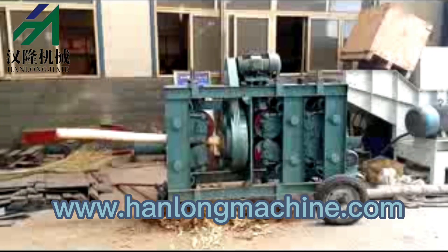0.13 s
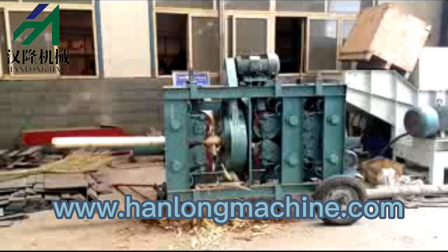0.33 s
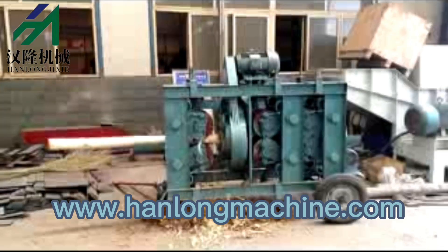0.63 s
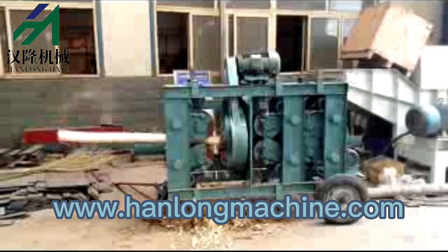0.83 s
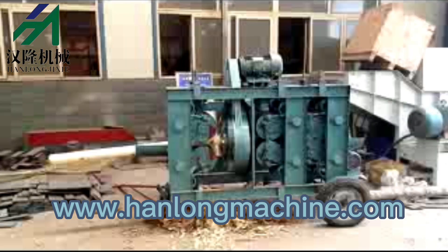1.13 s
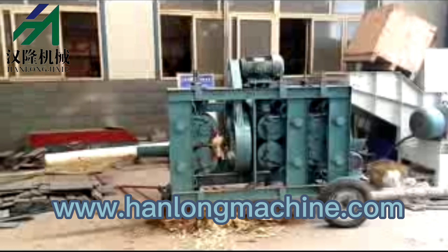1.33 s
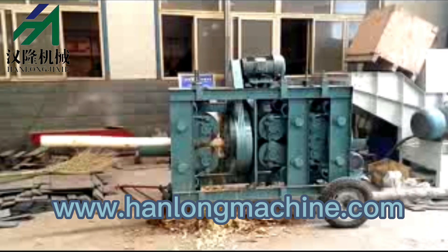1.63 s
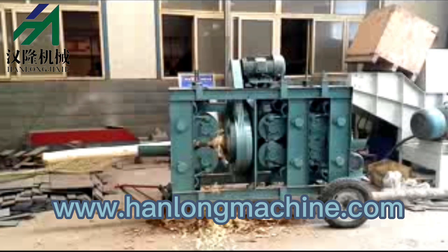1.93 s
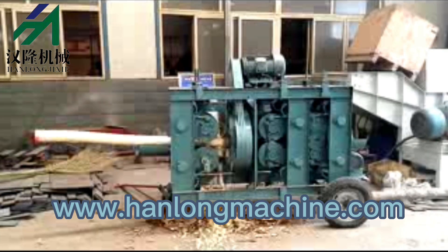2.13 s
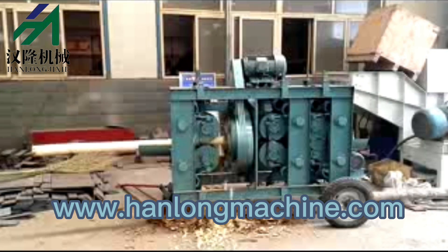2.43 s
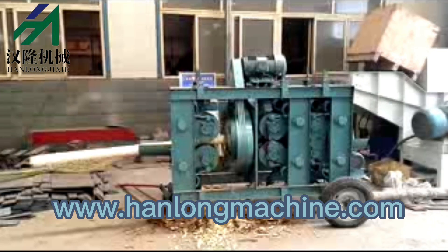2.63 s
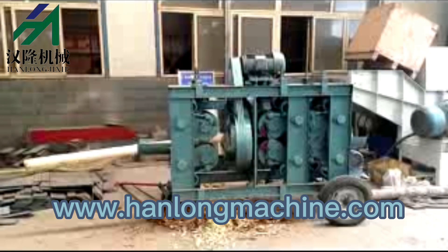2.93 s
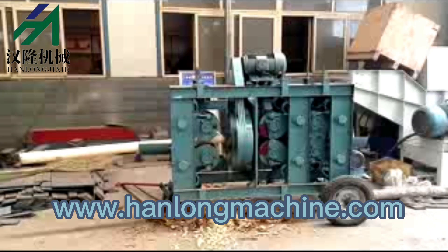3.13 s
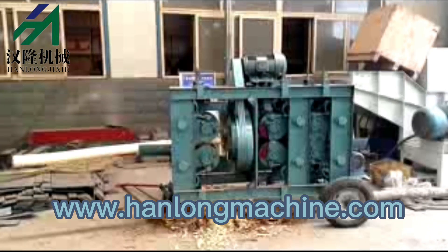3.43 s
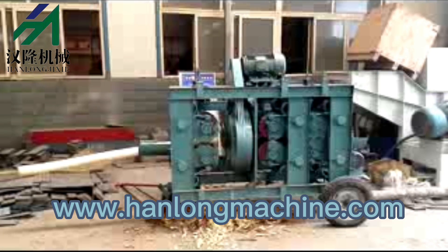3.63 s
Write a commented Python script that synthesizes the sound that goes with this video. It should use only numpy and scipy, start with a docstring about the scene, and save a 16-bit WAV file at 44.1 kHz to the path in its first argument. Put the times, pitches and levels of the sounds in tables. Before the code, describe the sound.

A wood debarker scrapes a log with a steady harsh roar over motor rumble; rasping bites, thin squeals and dull thumps come and go, then a loud knock rattles near the end, outdoors in stereo.

```python
"""A wood debarker at work in a yard, in stereo from two microphone ports.
From the start the rotor's knives scrape a log as random snaps of noise over a coloured, ringing drive rumble.
A thin squeak sounds at the start, over the first bites of the knives and their faint singing (noise-driven
resonances); the log thumps on the feed rollers as decaying sines. Near the end it knocks and rattles on the
steel in ringing modes and cracks; a wall answers, and the camera's limiter holds the knock down."""
import sys
import numpy as np
from scipy import signal
from scipy.fft import rfft, irfft, next_fast_len
from scipy.io import wavfile
from scipy.ndimage import uniform_filter1d, map_coordinates

SR = 44100
rng = np.random.default_rng(int(sys.argv[2]) if len(sys.argv) > 2 else 0)


def wav_record(signal):
    """Record a signal, one row per channel, as 16-bit PCM in the file named by sys.argv[1]."""
    frames = np.transpose(np.atleast_2d(signal))
    bounded = np.clip(frames, -1, 1)
    # unit amplitude maps onto the largest positive 16-bit level
    quanta = np.round(bounded * 32767).astype(np.int16)
    wavfile.write(sys.argv[1], SR, quanta)


N = 167139

# colour of the flying chips: (frequency [Hz], relative density [dB per Hz])
CHIP_SPECTRUM = [(2000, -27.5), (3500, -6.5), (4100, -2.5), (4600, 1.5), (5200, -6), (6000, -13.5),
                 (7000, -16.5), (8500, -24.5), (9800, -32.5), (11500, -117)]


def amp(db):
    """Decibels to gain."""
    return 10 ** (np.asarray(db) / 20)


def unit(x):
    """Scaled to rms 1."""
    return x / np.sqrt(np.mean(x ** 2) + 1e-20)


def along(points, hz):
    """(Hz, value) points read on a log frequency axis."""
    point_hz, values = np.transpose(points)
    return np.interp(np.log(hz + 1), np.log(point_hz + 1), values)


def clock():
    """The time of every sample [s]."""
    return np.arange(N) / SR


def curves(rows):
    """One value per sample for each column after the time."""
    times, *columns = np.transpose(rows)
    return [np.interp(clock(), times, column) for column in columns]


def wobble(rate):
    """A smooth random curve through `rate` random knots a second."""
    knots = rng.standard_normal(4096)
    return map_coordinates(knots, [clock() * rate + 2], mode="wrap")


def filtered(x, response):
    """x with its spectrum multiplied by a response of frequency, padded against wrap-around."""
    size = next_fast_len(N + SR // 2)
    gain = response(np.fft.rfftfreq(size, 1 / SR))
    return irfft(rfft(x, size) * gain, size)[..., :N]


def spread(pair, spectrum):
    """Two unrelated signals coloured and mixed as mid and side into a stereo sound of rms 1."""
    # how alike the two ports hear the place: (frequency [Hz], left-right correlation [-1 to 1])
    likeness = [(30, -0.18), (70, 1), (200, 0.91), (350, 0.69), (550, 0.32), (850, 0.54), (1600, 0.52),
                (2100, 0.086), (3200, 0.16), (4300, -0.13), (5500, -0.065), (9000, 0.23)]

    def mid_side(hz):
        turn = np.arccos(np.clip(along(likeness, hz), -1, 1)) / 2
        return amp(along(spectrum, hz)) * [np.cos(turn), np.sin(turn)]

    mid, side = filtered(pair, mid_side)
    return unit(np.array([mid + side, mid - side]))


def patchy(patchy_db):
    """Two noises sharing smooth time-frequency patches of random gain, rms 1."""
    z = signal.stft(rng.standard_normal((2, N)), nperseg=512)[2]
    field = rng.standard_normal(z.shape[1:])
    field = uniform_filter1d(uniform_filter1d(field, size=5, axis=0), size=10, axis=1)
    return unit(signal.istft(z * amp(patchy_db * unit(field)), nperseg=512)[1][:, :N])


def tearing(patchy_db):
    """Snapping fibres of uneven size, each a fading swell of noise power, over steady rubbing noise."""
    snaps_per_s, size_db, snap_share, t60 = 650, 0.5, 0.25, 0.016  # share of power; t60 in s
    sizes = amp(size_db * np.minimum(rng.exponential(size=N), 2.5))
    snaps = (rng.random(N) < snaps_per_s / SR) * sizes ** 2
    # power fades at twice the rate of amplitude
    energy = signal.lfilter([1], [1, -np.exp(-2 * np.log(1000) / (t60 * SR))], snaps)
    power = 1 - snap_share + snap_share * energy / energy.mean()
    return np.sqrt(power) * patchy(patchy_db)


def resonance(hz, width_hz):
    """A resonance driven at random, heard at two points, rms 1: slow noise on a sine and a cosine."""
    phase = 2 * np.pi * np.cumsum(hz * np.ones(N)) / SR
    points = [wobble(width_hz) * np.sin(phase) + wobble(width_hz) * np.cos(phase) for _ in range(2)]
    return unit(np.array(points))


def burst(start, attack, hold, t60):
    """An envelope [s]: exponential attack, release by 60 dB per t60 once `hold` has passed since start."""
    t = np.maximum(clock() - start, 0)
    release = np.exp(-np.log(1000) * np.maximum(t - hold, 0) / t60)
    return (1 - np.exp(-t / attack)) * release


def knives():
    """The knives scrape, the housing roars and chips hiss: torn noises sharing one chatter in level."""
    # how hard the knives work: (time [s], scraping before trim [dB], chip hiss [dB])
    load = [(0, -16, -18.5), (0.18, -17.5, -22.5), (0.42, -15, -21), (0.68, -18.5, -22), (0.88, -17, -23),
            (1.12, -17, -20.5), (1.23, -19.5, -24), (1.35, -17.5, -22.5), (1.65, -18, -21.5),
            (2.03, -20.5, -24.5), (2.45, -17, -20.5), (2.8, -20, -23), (2.98, -16, -23.5),
            (3.15, -18.5, -23), (3.3, -18, -21.5), (3.55, -19, -21), (3.79, -19.5, -23.5)]
    # roar of the housing: (time [s], level before trim [dB])
    housing = [(0, -21.5), (0.4, -22), (0.7, -24.5), (1.1, -24), (1.22, -23.5), (1.34, -19.5), (1.6, -24),
               (2.0, -24), (2.75, -25), (3.3, -23), (3.79, -23.5)]
    # colours of roar and scraping: (frequency [Hz], relative density [dB per Hz])
    roar_spectrum = [(200, -39), (430, -10.5), (540, 4.5), (660, 0), (780, 4), (1000, 1.5), (1250, 1.5),
                     (2000, -11.5), (5000, -66), (11000, -92)]
    scrape_spectrum = [(400, -39.5), (900, -10), (1400, -1), (1900, 0), (2200, 1), (2600, 0.5),
                       (3400, -0.5), (4000, -7), (5500, -11.5), (8000, -35), (10000, -44.5), (11500, -104)]
    roar_trim_db, scrape_trim_db = 0.5, 0.5

    scrape_db, hiss_db = curves(load)
    roar_db, = curves(housing)
    chatter_db = 0.4 * wobble(27.55)
    roar_db = roar_db + roar_trim_db + chatter_db + 0.13 * wobble(11)
    roar = amp(roar_db) * spread(tearing(patchy_db=1.9), roar_spectrum)
    scrape_db = scrape_db + scrape_trim_db + chatter_db + 0.12 * wobble(7.83)
    scrape = amp(scrape_db) * spread(tearing(patchy_db=1.5), scrape_spectrum)
    hiss_db = hiss_db + chatter_db + 0.38 * wobble(14)
    hiss = amp(hiss_db) * spread(tearing(patchy_db=2.3), CHIP_SPECTRUM)
    return roar + scrape + hiss


def rasp_bursts():
    """Bites rip off bark and throw chips, each rasping around its own pitch; the last is the knock's tail."""
    # bursts of rasp, bites into the bark and last the tail of the knock: (time [s], rasp level [dB],
    # hold [s], hiss level [dB], centre of the rasp [Hz], how far the centre stands out [dB])
    burst_rows = [(.005, -18, 0.032, -25, 1790, 1), (0.096, -14.5, .02, -32, 1500, 7.5),
                  (0.29, -31, 0.012, -16, 1390, 6), (0.385, -16.5, 0.039, -37, 1280, 8.5),
                  (0.513, -15.5, 0.033, -26, 2530, 17), (0.761, -15, 0.024, -19, 2400, 3),
                  (0.985, -14, 0.013, -22, 3150, 17), (0.989, -20, 0.029, -24, 1650, 7),
                  (1.01, -20, 0.019, -29, 2900, 11), (1.021, -16.5, 0.023, -31.5, 1030, 6.5),
                  (1.083, -16, 0.033, -24, 2520, 6), (1.314, -21.5, 0.03, -39, 845, 7),
                  (2.06, -20, 0.058, -42, 925, 2.5), (2.277, -16.5, 0.026, -18.5, 2850, 18),
                  (2.339, -18, 0.0041, -17.5, 3000, 2.5), (2.366, -14.5, 0.014, -26, 1700, 4.5),
                  (2.471, -18, 0.02, -25, 2670, 10), (2.945, -22, 0.03, -46, 1780, 9.5),
                  (3.023, -21, 0.011, -22.5, 2960, 10), (3.628, -13.5, 0.036, -23.5, 800, -3)]
    # colour of the rasp: (frequency [Hz], relative density [dB per Hz])
    bark_spectrum = [(350, -16.5), (750, -6), (1400, -2.5), (2600, -6.5), (3400, -11), (4200, -7),
                     (5500, -29), (8000, -37), (10000, -39.5), (11500, -80)]
    attack_s, t60_s, focus_octaves = 0.001, 0.045, 0.12

    bark = spread(tearing(patchy_db=1.8), bark_spectrum)
    chips = spread(tearing(patchy_db=1.6), CHIP_SPECTRUM)
    out = np.zeros((2, N))
    for start, rasp_db, hold, chip_db, focus_hz, focus_db in burst_rows:
        def focus(hz):
            octaves = np.log2((hz + 1) / focus_hz)
            return amp(focus_db * np.exp(-.5 * (octaves / focus_octaves) ** 2))

        rasp = amp(rasp_db) * unit(filtered(bark, focus))
        out += burst(start, attack_s, hold, t60_s) * (rasp + amp(chip_db) * chips)
    return out


def squeals():
    """Two knives sing as gliding resonances, a rough ring above; rubbing steel squeaks at the start."""
    # the singing knife: (time [s], pitch [Hz], level [dB])
    knife_song = [(0, 3500, -33), (.2, 3510, -27.5), (.55, 3560, -28), (.85, 3570, -27.5), (1.3, 3603, -30),
                  (1.65, 3660, -34.5), (1.98, 3650, -27.5), (2.25, 3630, -33.5), (3.7, 3640, -42)]
    # a second knife, lower, rising slightly, then dropping as it swells and fades:
    # (time [s], pitch [Hz], level [dB])
    low_song = [(.4, 3420, -43), (.8, 3415, -28.5), (1.2, 3496, -29.5), (1.65, 3536, -29),
                (2.05, 3384, -39), (2.25, 3290, -23.5), (2.7, 3300, -44.5)]
    # the higher, rougher ring: (time [s], pitch [Hz], level [dB])
    rough_ring = [(0, 4620, -29), (1.2, 4600, -44.5), (1.65, 4620, -31), (2.0, 4500, -30),
                  (2.35, 4580, -28.5), (2.9, 4660, -33), (3.3, 4650, -41)]

    def sing(rows, width_hz):
        hz, db = curves(rows)
        return amp(db) * resonance(hz, width_hz)

    songs = sing(knife_song, width_hz=55) + sing(low_song, width_hz=55) + sing(rough_ring, width_hz=190)
    squeak_shape = burst(start=0.0042, attack=0.0057, hold=0.18, t60=0.13)
    squeak = amp(-42) * squeak_shape * resonance(hz=10900, width_hz=130)
    return songs + squeak


def knock():
    """The log strikes the steel and rattles: each contact cracks as noise and rings anew in damped modes."""
    # contacts with the steel: (time [s], strength [dB])
    contacts = [(3.5875, -2), (3.589, -3.5), (3.6025, -3), (3.6080, -3), (3.6115, -4.5), (3.6175, -2),
                (3.6270, -7)]
    # what rings: (frequency [Hz], level relative to the contact [dB], t60 [s])
    modes = [(360, -17, 0.12), (618, -12.5, 0.042), (734, -11.5, 0.13), (784, -13, 0.077),
             (995, -15.5, 0.09), (1276, -13, 0.07), (1482, -8, 0.08), (1654, -8.5, 0.052),
             (1780, -4, 0.055), (2100, -4, 0.04), (2270, -7.5, 0.046), (2400, -5, 0.046),
             (2683, -7.5, 0.036), (2850, -6.5, 0.044)]
    # colour of the crack: (frequency [Hz], relative density [dB per Hz])
    crack_spectrum = [(300, -25), (800, -5.5), (1600, 4), (2800, 3), (3500, -6.5), (5000, -8.5),
                      (7200, -31), (11000, -30)]
    crack_db, crack_t60_s = -1.5, 0.035  # level relative to the contact

    ringing = np.zeros((2, N + SR))
    t = np.arange(SR // 3) / SR
    for start, db in contacts:
        first = round(start * SR)
        for hz, mode_db, t60 in modes:
            # the phase differs a little between left and right
            phase = rng.uniform(0, 2 * np.pi) + .35 * rng.standard_normal((2, 1))
            fade = np.exp(-np.log(1000) * t / t60) * (1 - np.exp(-t / 0.0011))
            detuned_hz = hz * rng.normal(1, 0.0061)
            tone = np.sin(2 * np.pi * detuned_hz * t + phase)
            ringing[:, first:first + len(t)] += amp(db + mode_db) * fade * tone
    # the cracks add in power
    power = sum((amp(db) * burst(start, 0.00023, 0, crack_t60_s)) ** 2 for start, db in contacts)
    crack = np.sqrt(power) * spread(rng.standard_normal((2, N)), crack_spectrum)
    return ringing[:, :N] + amp(crack_db) * crack


def thumps():
    """The swaying log bumps the feed rollers, each bump a decaying sine."""
    # bumps on the rollers: (time [s], pitch [Hz], level [dB])
    bumps = [(0.291, 317, -9), (0.409, 201.5, -11.5), (0.56, 228, -18), (1.127, 371, -13.5),
             (1.328, 285, -14), (2.102, 212, -17), (2.318, 197, -17)]
    attack_s, t60_s = 0.0051, 0.15
    out = np.zeros(N)
    for start, hz, db in bumps:
        tone = np.sin(2 * np.pi * hz * (clock() - start))
        out += amp(db) * burst(start, attack_s, 0, t60_s) * tone
    return out


def drive():
    """Motor, belts and rotor rumble as coloured noise; the steel frame rings in noise-driven resonances."""
    # rumble of the drive: (time [s], level [dB])
    rumble_level = [(0, -24.5), (0.45, -24.5), (1.3, -24.5), (1.9, -25.5), (2.4, -25.5), (3.79, -25.5)]
    # colour of the rumble: (frequency [Hz], relative density [dB per Hz])
    rumble_spectrum = [(20, -38), (40, -47), (62, -16.5), (90, -5), (125, -3.5), (160, -4.5), (185, 3),
                       (240, 1), (365, 1.5), (440, -6), (700, -12), (4000, -93)]
    # what the frame rings with: (frequency [Hz], width [Hz], level before trim [dB])
    frame = [(126.9, 6, -39.5), (181.4, 5, -41), (272.3, 12, -37), (316.6, 6, -45.5), (576, 16, -34.5),
             (731, 18, -36.5), (917, 7, -33.5), (1205, 33, -43), (1487, 30, -37), (2177, 79, -27.5)]
    frame_trim_db = -3.5

    level_db, = curves(rumble_level)
    rumble = amp(level_db + 0.56 * wobble(30)) * spread(patchy(patchy_db=0.15), rumble_spectrum)
    ring = sum(amp(db) * resonance(hz, width_hz) for hz, width_hz, db in frame)
    flat = [(1, 0), (2, 0)]  # no added colour
    return rumble + amp(frame_trim_db) * np.std(ring) * spread(ring, flat)


def yard(x):
    """The wall and ground answer with a short tail: noise that fades at a rate set by frequency."""
    # how long the yard answers: (frequency [Hz], t60 [s])
    tail_t60 = [(200, .3), (2000, 0.97), (10000, 0.19)]
    hz, t, z = signal.stft(rng.standard_normal((2, SR // 2)), SR, nperseg=256)
    fade = np.exp(-np.log(1000) * t / along(tail_t60, hz)[:, None])
    tail = signal.istft(z * fade, SR, nperseg=256)[1]
    return signal.fftconvolve(x, tail / np.linalg.norm(tail[0]), axes=1)[:, :N]


def scene():
    """The machine at work, with the ringing and cracks of the knock echoing in the yard."""
    yard_db = -14.5
    blow = knock()
    machine = knives() + rasp_bursts() + squeals() + thumps() + drive()
    return machine + blow + amp(yard_db) * yard(blow)


def record(dry):
    """Port colour, a limiter that recovers slowly, soft clipping and the band limit."""
    # colour of the two microphone ports: (frequency [Hz], left minus right [dB])
    port_balance = [(100, -0.5), (1800, 0), (2200, -3.5), (2700, -6), (3300, -4.5), (3650, 0), (4000, 6),
                    (4550, 15), (5400, 7), (6300, 6.5), (7200, 0.5), (8100, 1.5), (9300, 5.5)]
    ceiling_db, release_s, clip_db, top_hz = -3, 0.22, -0.3, 11000

    def ports(hz):
        ratio = amp(along(port_balance, hz))
        # the summed power of both sides stays constant
        return np.array([ratio, np.ones_like(ratio)]) * np.sqrt(2 / (1 + ratio ** 2))

    x = filtered(dry, ports)
    power = np.abs(uniform_filter1d(np.mean(x ** 2, axis=0), size=160))
    excess_db = np.maximum(10 * np.log10(power + 1e-12) - ceiling_db, 0)
    # the cut jumps to each new excess, then decays exponentially in dB
    recovery = np.exp(clock() / release_s)
    cut_db = np.maximum.accumulate(excess_db * recovery) / recovery
    x = x * amp(-cut_db)
    x = x / (1 + (x / amp(clip_db)) ** 8) ** (1 / 8)
    return filtered(x, lambda hz: hz < top_hz)


dry = scene()
out = record(dry)
wav_record(out)
```